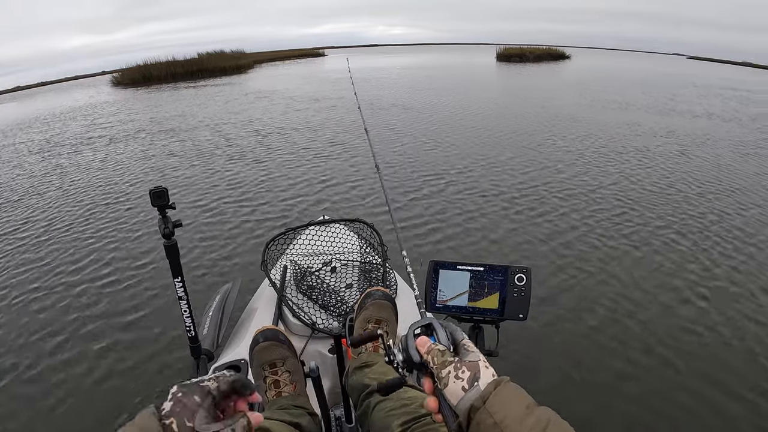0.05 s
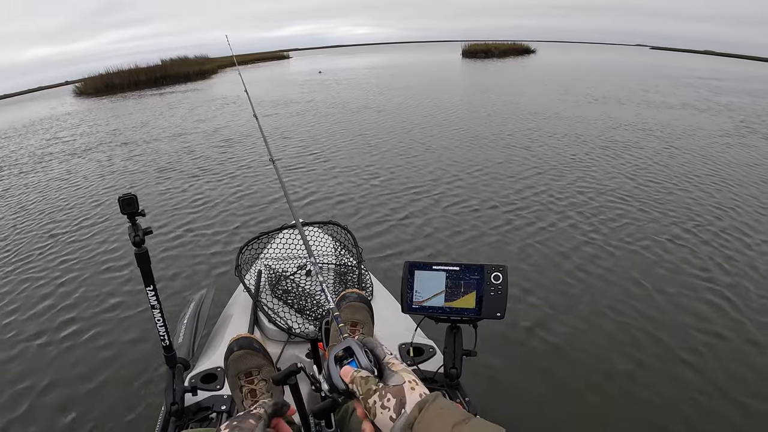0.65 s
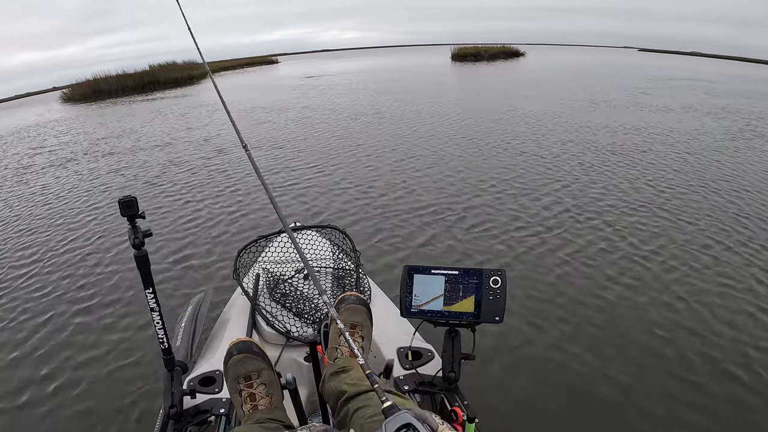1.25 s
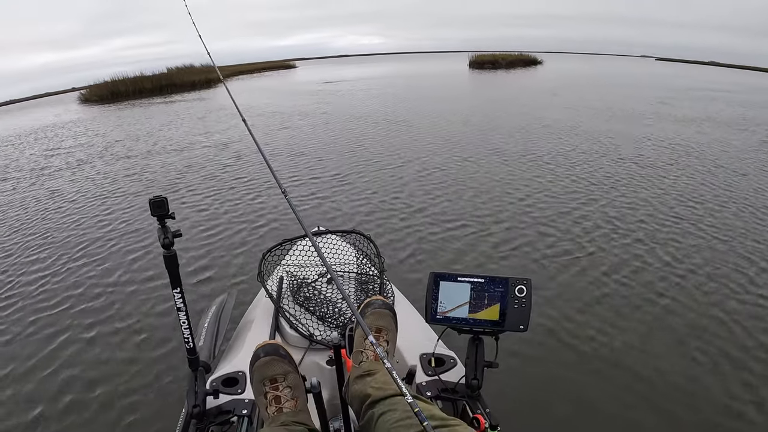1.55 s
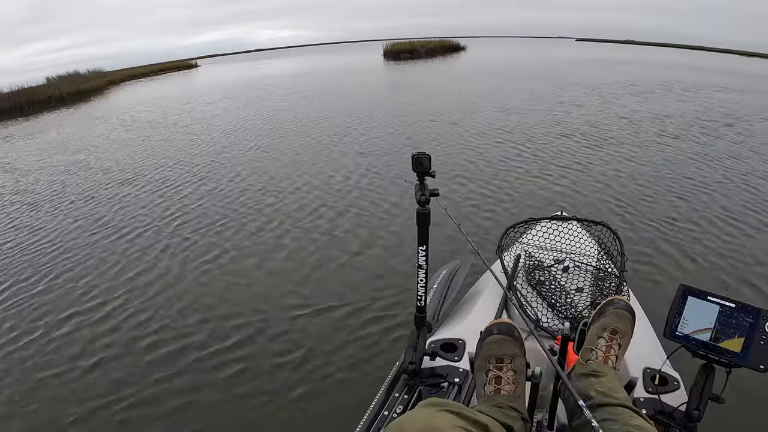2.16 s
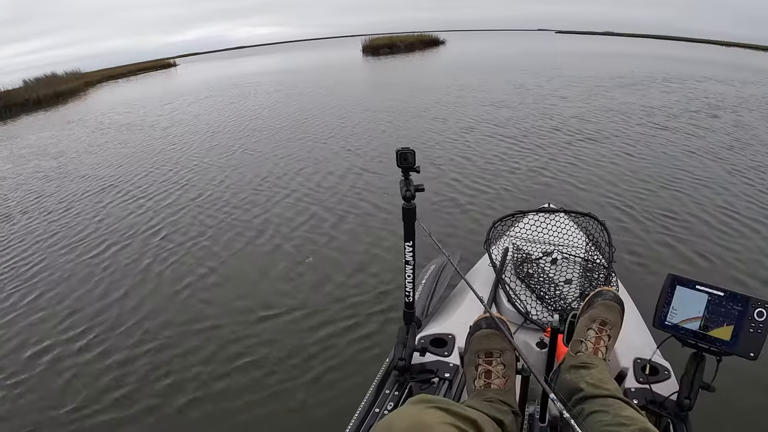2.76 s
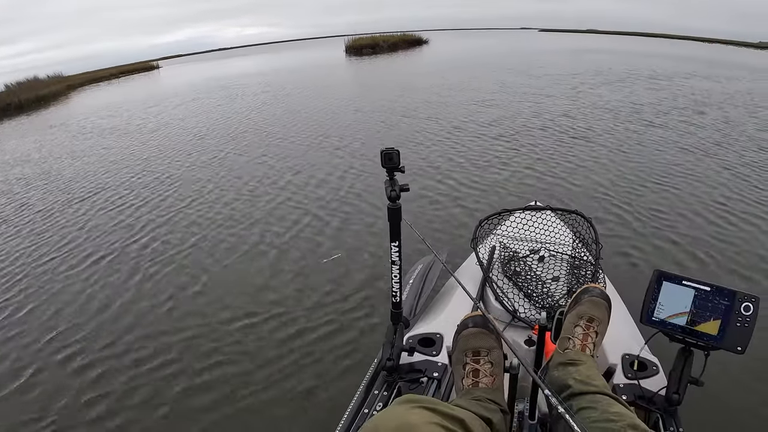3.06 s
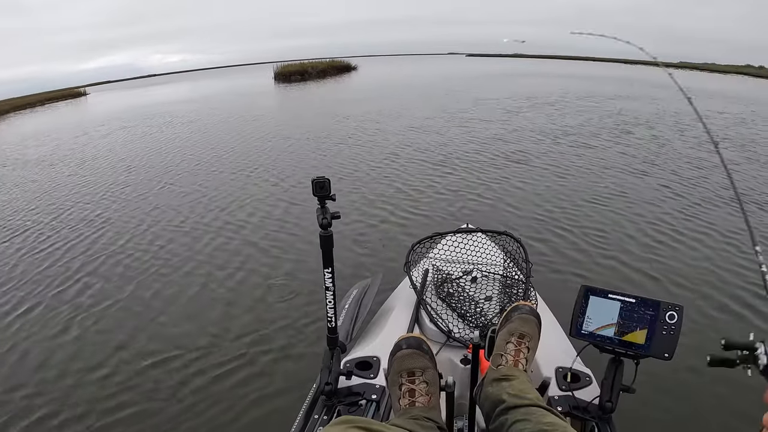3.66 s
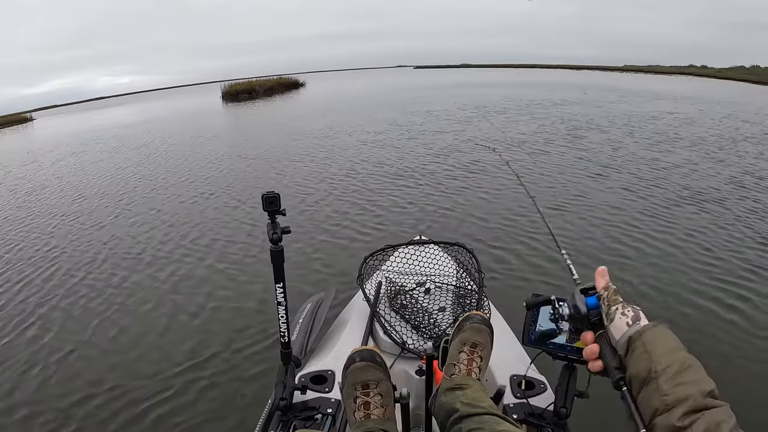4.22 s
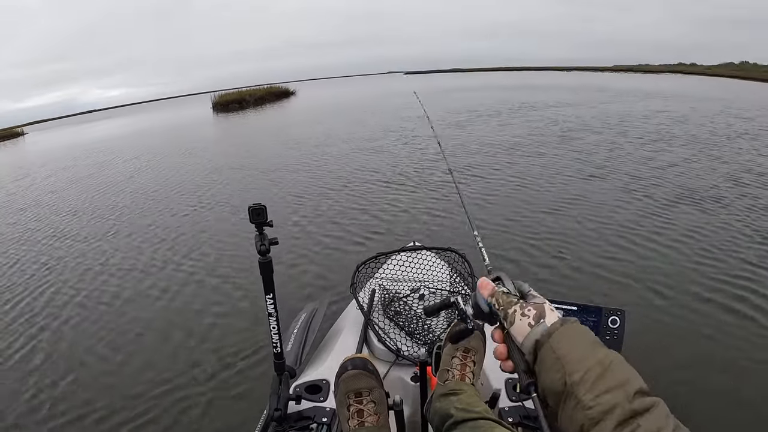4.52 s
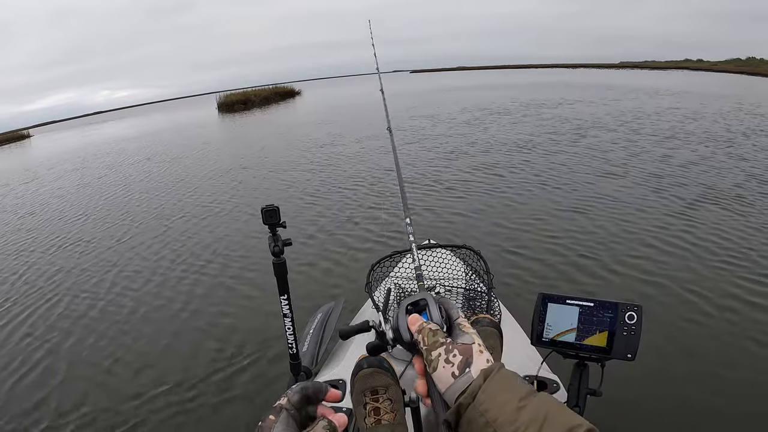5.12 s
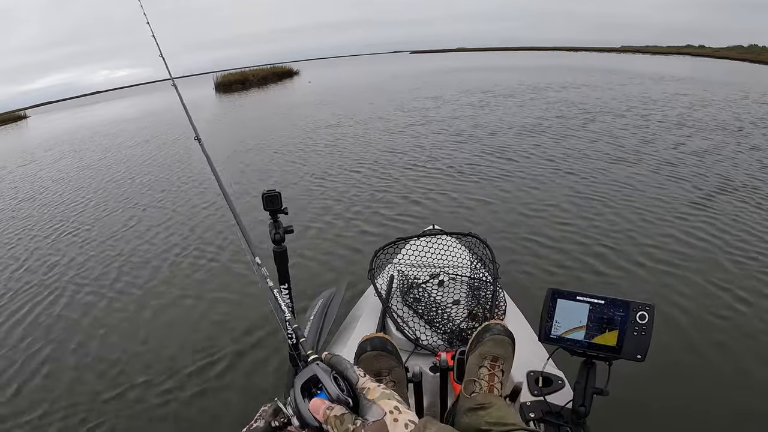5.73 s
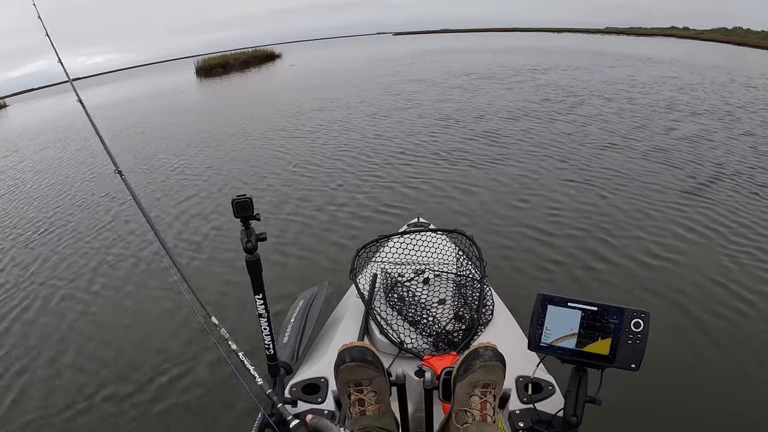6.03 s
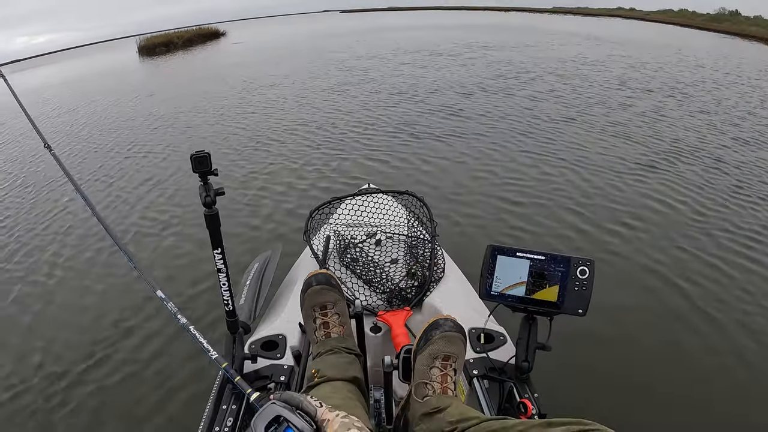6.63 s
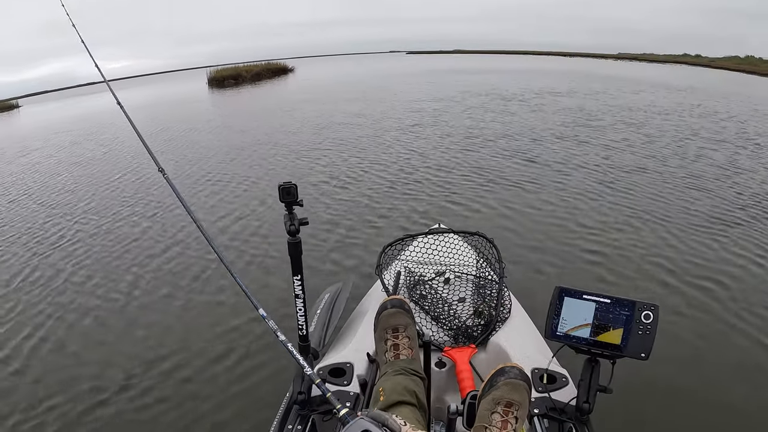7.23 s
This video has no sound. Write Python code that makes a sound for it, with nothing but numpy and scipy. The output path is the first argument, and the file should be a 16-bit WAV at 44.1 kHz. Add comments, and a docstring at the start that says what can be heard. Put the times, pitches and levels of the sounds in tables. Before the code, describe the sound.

A fishing rod swishes and its reel whirs and clicks, then feet bump a hollow plastic kayak, over light wind and a low hum.

```python
"""An angler casts from a plastic kayak, over a low hum, a light breeze on open water and rustling sleeves.
The spool of a baitcasting reel rings faintly and is stopped with a few clicks; two small drops plip.
The spool clicks free, the rod swishes and whistles, and the spool whines down as the line flies out.
Feet and gear bump the hollow hull, the reel snaps back into gear, and lighter bumps follow."""
import sys
import numpy as np
from scipy.fft import rfft, irfft, next_fast_len
from scipy.io import wavfile
from scipy.ndimage import uniform_filter1d, map_coordinates

SR = 44100
rng = np.random.default_rng(int(sys.argv[2]) if len(sys.argv) > 2 else 0)


def digitize_waveform(pressure):
    """Quantize a signal to 16-bit integers and store it at the path in sys.argv[1].

    Rows of a 2-D input are taken as channels; values are limited to [-1, 1].
    """
    field = np.atleast_2d(pressure).T
    bounded = np.clip(field, -1, 1)
    quanta = np.round(bounded * 32767).astype(np.int16)
    wavfile.write(sys.argv[1], SR, quanta)


N = 325678

# the bearings' partials: (multiple of the turning rate [x], level [dB])
BEARING_PARTIALS = [(34, -14.5), (35.3, -8), (44.5, -21), (62, -12.5)]
# fader ride on the bearings' whine: (time [s], relative level [dB])
BEARING_RIDE = [(4.3, -63), (4.5, -86), (4.58, -72), (4.69, -55), (4.8, -60.5), (4.94, -56), (5.0, -69),
                (5.35, -66), (5.85, -76)]
# tone colour of the bearings: (frequency [Hz], gain [dB])
BEARING_EQ = [(2500, 0), (5500, 1), (8700, 5), (9800, -11), (12000, -15), (16000, -30)]
# tone colour of line whipping off the spool: (frequency [Hz], gain [dB])
LINE_EQ = [(200, 5.5), (380, 0.5), (600, -4), (1200, -2), (2400, 3.5), (3300, 2), (4300, -8), (6000, -8)]
# resonances of the spool's metal: (frequency [Hz], width [Hz], level [dB])
SPOOL_MODES = [(5750, 630, -1.5), (7310, 270, 4.5), (8380, 240, -1.5), (9190, 500, -3), (10000, 520, -8),
               (12000, 1200, -22), (15190, 700, -14)]
# swells in which the turning spool rings: (start [s], length [s], relative level [dB])
SPOOL_SWELLS = [(.15, 0.39, -67), (4.18, .55, -62.5), (5.02, .3, -67), (5.36, 0.49, -61.5)]
# clutch and thumb bar cues: (time [s], level [dB], pitch [Hz], frame send [dB], spool ring send [dB],
# ring centre [Hz], contact length [s])
CLICK_CUES = [(0.592, -53.5, 3380, 1, -6.5, 7500, 0.00076), (1.0575, -43, 2600, -2, -8.5, 8500, 0.00052),
              (1.071, -38.5, 1980, -3.5, 11, 7450, 0.00076), (1.0728, -26.5, 3104, 3.5, 4.5, 7400, 0.00085),
              (3.611, -23, 3500, -6, -8.5, 5500, 0.00067), (4.551, -63, 5000, 8, -5, 11000, .001),
              (5.881, -43.5, 3000, 2.5, -2.5, 9500, 0.00055),
              (5.893, -28.5, 2600, -14.5, -13, 9500, 0.00043), (5.9062, -23.5, 2660, -4, 2, 9500, 0.00073)]
# tone colour of the reel's frame: (frequency [Hz], gain [dB])
FRAME_EQ = [(100, -18), (300, -17), (780, 0), (1150, -6), (1700, 0.5), (2100, 3), (2600, -8), (4000, -0.5),
            (4800, -19.5), (6000, -6), (9000, -27), (12000, -8.5), (16000, -19.5)]
# rod and sleeve sweeping the air: (time [s], level [dB], half length [s], brightness [Hz])
SWISH_CUES = [(1.177, -50, 0.019, 5470), (1.55, -68.5, 0.032, 12000), (2.125, -62.5, 0.017, 11000),
              (4.174, -36, 0.004, 2200), (4.197, -39, 0.013, 8400), (4.282, -42.5, 0.0133, 7300),
              (6.001, -50, 0.033, 3520), (6.077, -48, 0.018, 7000)]
# the rod tip's whistle through the cast: (time [s], pitch [Hz], level [dB])
TIP_GLIDE = [(4.09, 1200, -100), (4.125, 1367, -66), (4.15, 1447, -32.5), (4.17, 1585, -53),
             (4.205, 2430, -43), (4.24, 2380, -65), (4.26, 2200, -100)]
# bumps on the hull: (time [s], level [dB], brightness [Hz])
KNOCK_CUES = [(1.992, -48, 2400), (2.396, -46.5, 2030), (3.443, -48.5, 1800), (3.722, -49.5, 2700),
              (4.546, -47.5, 700), (4.975, -54, 1400), (5.368, -42, 1900), (5.662, -14, 1640),
              (5.726, -22, 1270), (5.786, -16, 870), (5.8881, -19, 1050), (6.028, -25, 1240),
              (6.568, -39.5, 700), (6.578, -36.5, 1900), (6.591, -30, 696), (6.676, -32, 730),
              (6.879, -32.5, 1470), (6.924, -37, 800), (6.977, -26.5, 810), (7.038, -33.5, 1900),
              (7.049, -33.5, 1100)]
# resonances of the hollow hull: (frequency [Hz], level [dB], 60 dB decay time [s])
HULL_MODES = [(155, -8, 0.24), (221, -3, 0.19), (342, 1.5, 0.089), (398.5, 1.5, 0.11), (510.5, -6.5, 0.17),
              (594.5, -6, 0.14), (773, -13.5, 0.1), (1436, -15, 0.09)]
# tone colour of the plastic shell: (frequency [Hz], gain [dB])
SHELL_EQ = [(40, -6), (110, -3.5), (160, 6), (260, -2.5), (370, 2), (500, -0.5), (780, -2), (1100, -5.5),
            (1500, -6.5), (2700, -7), (7000, -6), (16000, 12)]
# light ticks, and the hard, bright edge of some hull knocks: (time [s], level [dB], pitch [Hz])
TICK_CUES = [(2.279, -50.5, 4000), (2.318, -62.5, 2970), (2.365, -48.5, 4070), (3.483, -60.5, 2320),
             (3.530, -58, 2400), (3.671, -61.5, 3200), (3.814, -60, 2470), (5.369, -52, 2880),
             (6.581, -43.5, 2470), (7.039, -43, 2600)]
# drops and bubbles: (time [s], level [dB], starting pitch [Hz], swell time [s])
DROP_CUES = [(.899, -47, 975, 0.0092), (3.251, -56.5, 1820, 0.0054)]
# arms and legs moving inside their clothes: (start [s], length [s], level [dB])
CLOTH_SWELLS = [(-.05, 0.22, -53.5), (.22, 0.24, -63), (.65, 0.3, -57.5), (1.0, 0.16, -52.5),
                (1.25, 0.37, -54), (1.72, 0.15, -65), (2.0, 0.12, -55), (2.58, 0.24, -60.5),
                (2.86, 0.28, -65.5), (3.49, 0.043, -55.5), (3.64, 0.28, -66), (3.9, 0.12, -55),
                (4.09, 0.2, -48), (4.36, .35, -58), (4.8, 0.515, -59), (5.25, 0.94, -55.5),
                (5.84, 0.18, -48), (6.22, .55, -52.5), (6.8, 0.21, -60), (7.05, 0.3, -57)]
# tone colour of jacket cloth: (frequency [Hz], gain [dB])
CLOTH_EQ = [(80, -15), (170, 3.5), (350, -2), (700, -2), (1200, -3.5), (1500, -6), (2300, -5.5),
            (4000, -13.5), (6000, -20.5), (10000, -22.5), (16000, -27.5)]
# fader ride on the low hum: (time [s], relative level [dB])
HUM_RIDE = [(0.0, -41.0), (0.35, -40), (0.56, -56.5), (1.1, -38.5), (1.64, -43.5), (1.91, -53.5),
            (2.06, -44.5), (2.21, -59.5), (2.3, -49.5), (2.96, -39.5), (4.67, -39), (5.57, -52),
            (5.66, -47), (5.78, -49), (5.87, -41.5), (6.08, -57), (6.2, -43.5), (7.38, -33)]
# fader ride on the wind's buffeting: (time [s], relative level [dB])
WIND_RIDE = [(0.0, -46), (0.89, -46.5), (1.58, -46), (1.91, -43), (2.42, -49.5), (3.59, -48.5), (4.25, -49),
             (4.7, -44.5), (7.38, -43.5)]
# tone colour of the wind's rumble: (frequency [Hz], gain [dB])
WIND_EQ = [(8, -11), (22, 1), (35, -3), (60, -3.5), (100, -9.5), (140, -20.5), (200, -29), (400, -33.5),
           (1500, -97.5)]
# tone colour of the hush over open water: (frequency [Hz], gain [dB])
AIR_EQ = [(80, -6), (200, -4.5), (400, -2), (1000, 1), (2000, -4.5), (4000, -9), (8000, -12.5),
          (12000, -14.5), (16000, -18)]

TOP_HZ = 15850
# the cast spins the spool up at once; it coasts down towards the pace of the falling lure
CAST_S, SPIN_UP_S, STOP_S = 4.2, 0.013, 7.4
LAUNCH_TURNS_HZ, SETTLED_TURNS_HZ, COAST_S = 382.6, 62, 0.62
# a heavier bump stays in contact longer; a duller one rings the hull more
TYPICAL_KNOCK_DB, KNOCK_CONTACT_S, DB_PER_DOUBLED_CONTACT = -23.5, 0.0026, 47
TYPICAL_KNOCK_HZ, HOLLOW_DB, HOLLOW_DB_PER_OCTAVE = 1010, -4.5, -4


def spool(whirr_db=-60, steepness=3, ring_db=-1):
    """The spool slows as the lure flies: its whine dives while its metal rings at fixed pitches."""
    t = np.arange(N) / SR
    coast = np.exp(-np.maximum(t - CAST_S, 0) / COAST_S)
    turns_hz = SETTLED_TURNS_HZ + (LAUNCH_TURNS_HZ - SETTLED_TURNS_HZ) * coast
    flying = np.clip((t - CAST_S) / SPIN_UP_S + 1, 0, 1) * (t < STOP_S)
    whine = np.zeros(N)
    for multiple, db in BEARING_PARTIALS:
        hz = multiple * turns_hz
        whine += amp(db) * eq(BEARING_EQ, hz) * breathy_tone(hz, width_hz=65) * (hz < TOP_HZ)
    whine *= amp(curves(BEARING_RIDE)[0])
    # the whipping line speaks only at high speed, its upper harmonics more smeared
    whirr = sum(eq(LINE_EQ, k * turns_hz) * breathy_tone(k * turns_hz, 12 * k) for k in range(1, 18))
    whirr *= amp(whirr_db) * (turns_hz / LAUNCH_TURNS_HZ) ** steepness
    ringing = swells(SPOOL_SWELLS, attack_s=0.11, sag_db_per_s=2.5, release_s=0.06)
    ring = ringing * amp(ring_db + 2.2 * wobble(15)) * noise(spool_metal)
    return flying * (whine + whirr) + ring


def spool_metal(hz):
    """Gain of the spool's resonances together."""
    return np.sqrt(sum((amp(db) * peak(hz, centre, width) ** 1.17) ** 2
                       for centre, width, db in SPOOL_MODES))


def reel_clicks(part_db=-2, damping=0.32, ring_width_hz=2200, boat_db=-11, boat_hz=1900):
    """A small part snaps home at its own pitch; the frame, the boat and the spool answer."""
    out, t = np.zeros(N), np.arange(SR // 8) / SR
    for s, db, pitch_hz, frame_db, ring_db, ring_hz, contact_s in CLICK_CUES:
        snap = contact(t, contact_s, tail_db=-22, tail_t60=0.043)
        part = hit(filtered(snap, lambda hz: peak(hz, pitch_hz, damping * pitch_hz) ** 2.15))
        jolt = contact(t, contact_s, tail_db=-18, tail_t60=0.028)
        frame = hit(filtered(jolt, lambda hz: eq(FRAME_EQ, hz)))
        # each click rings the spool's metal, strongest near its ring centre
        ring = hit(filtered(snap, lambda hz: spool_metal(hz) ** 1.1 * peak(hz, ring_hz, ring_width_hz)))
        scatter = rng.standard_normal(len(t)) * amp(-60 * t / 0.079) * (1 - np.exp(-t / 0.0012))
        boat = hit(filtered(scatter, lambda hz: eq(FRAME_EQ, hz) * lowpass(hz, boat_hz)))
        body = frame + amp(boat_db) * boat
        add(out, s, amp(db) * (amp(part_db) * part + amp(frame_db) * body + amp(ring_db) * ring))
    return out


def swishes():
    """Rod and sleeve whoosh through the air, each swish with its own length and brightness."""
    out, t = np.zeros(N), np.arange(SR // 4) / SR
    for s, db, half_s, bright_hz in SWISH_CUES:
        hiss = rng.standard_normal(len(t))
        rush = unit(filtered(hiss, lambda hz: peak(hz, 1200, 9100) * lowpass(hz, bright_hz)))
        envelope = np.exp(-((t - t.mean()) / half_s) ** 2 / 2)
        add(out, s - t.mean(), amp(db) * rush * envelope)
    return out


def rod_whistle():
    """Eddies shed by the thin tip sing higher as it speeds up."""
    pitch_hz, db = curves(TIP_GLIDE)
    return amp(db) * breathy_tone(pitch_hz, width_hz=410)


def hull_knocks(scatter_db=-6, scatter_hz=700):
    """Each bump thuds on the plastic shell and sets the hollow hull ringing."""
    out, t = np.zeros(N), np.arange(SR // 4) / SR
    for s, db, bright_hz in KNOCK_CUES:
        contact_s = KNOCK_CONTACT_S * 2 ** ((db - TYPICAL_KNOCK_DB) / DB_PER_DOUBLED_CONTACT)
        body_db = HOLLOW_DB + HOLLOW_DB_PER_OCTAVE * np.log2(bright_hz / TYPICAL_KNOCK_HZ)
        shell = lambda hz: eq(SHELL_EQ, hz) * lowpass(hz, bright_hz, order=2.9)
        thud = filtered(contact(t, contact_s, tail_db=-11.5, tail_t60=0.12), shell)
        # inside the hull only the lows keep bouncing
        scatter = rng.standard_normal(len(t)) * amp(-60 * t / 0.29)
        hollow = filtered(scatter, lambda hz: shell(hz) * lowpass(hz, scatter_hz))
        ring = np.zeros(len(t))
        for mode_hz, mode_db, t60 in HULL_MODES:
            decay = amp(mode_db + rng.normal(0, 1.4) - 60 * t / t60)
            ring += decay * np.sin(2 * np.pi * (mode_hz * t + rng.random()))
        body = (hit(ring) + amp(scatter_db) * hit(hollow)) * (1 - np.exp(-t / contact_s))
        add(out, s, amp(db) * (hit(thud) + amp(body_db) * body))
    return out


def ticks(contact_s=0.0015, damping=0.25, part_db=-2, frame_db=-3, bright_hz=7500):
    """Light ticks and the hard, bright edge of some hull knocks: a pitched snap with the frame's colour."""
    out, t = np.zeros(N), np.arange(SR // 8) / SR
    for s, db, pitch_hz in TICK_CUES:
        touch = contact(t, contact_s, tail_db=-21, tail_t60=0.04)
        snap = filtered(touch, lambda hz: lowpass(hz, bright_hz, order=4))
        part = hit(filtered(snap, lambda hz: peak(hz, pitch_hz, damping * pitch_hz) ** 1.24))
        frame = hit(filtered(snap, lambda hz: eq(FRAME_EQ, hz)))
        add(out, s, amp(db) * (amp(part_db) * part + amp(frame_db) * frame))
    return out


def drops(rise_per_s=14, jitter=0.03):
    """A bubble plips, its pitch bending up unevenly as it nears the surface."""
    out, t = np.zeros(N), np.arange(SR // 8) / SR
    for s, db, start_hz, swell_s in DROP_CUES:
        envelope = t / swell_s * np.exp((1 - (t / swell_s) ** 2) / 2)
        pitch_hz = start_hz * (1 + rise_per_s * t + jitter * wobble(390)[:len(t)])
        add(out, s, amp(db) * envelope * np.sin(phase(pitch_hz)))
    return out


def sleeves(rest_db=-70):
    """Jacket cloth rubs in small uneven catches as each move gathers speed, eases off and rests."""
    catches_db = 1.4 * wobble(35) + 1.4 * wobble(400)
    motion = swells(CLOTH_SWELLS, attack_s=0.059, sag_db_per_s=5, release_s=0.12)
    return np.hypot(amp(rest_db), motion) * amp(catches_db) * noise(lambda hz: eq(CLOTH_EQ, hz))


def hum(hum_hz=90.6, waver_hz=3.184, fuzz_db=-10, trim_db=-1, flutter_db=0.5):
    """A low, fuzzy hum wavers in pitch and level."""
    tone = unit(np.sin(phase(hum_hz + waver_hz * wobble(22))))
    fuzz = noise(lambda hz: peak(hz, hum_hz, 28) ** 2)
    return amp(curves(HUM_RIDE)[0] + trim_db + flutter_db * wobble(13)) * (tone + amp(fuzz_db) * fuzz)


def breeze(trim_db=1.73, air_db=-66):
    """Light wind buffets the microphone over the even hush of open water."""
    gusts = amp(curves(WIND_RIDE)[0] + trim_db + 1.2 * wobble(6.2))
    return gusts * noise(lambda hz: eq(WIND_EQ, hz)) + amp(air_db) * noise(lambda hz: eq(AIR_EQ, hz))


def contact(t, length_s, tail_db, tail_t60):
    """A chattering transient and its scatter round the boat, driving all pitches about evenly."""
    strike = t / length_s * np.exp(1 - t / length_s)
    tail = amp(tail_db - 60 * t / tail_t60) * (1 - np.exp(-t / length_s))
    chatter = rng.standard_normal(len(t)) * (strike + tail)
    power = np.abs(uniform_filter1d(np.abs(rfft(chatter)) ** 2, size=36))
    flatten = (power / power.mean()) ** -0.5
    return filtered(chatter, lambda hz: np.interp(hz, np.fft.rfftfreq(len(t), 1 / SR), flatten))


def swells(rows, attack_s, sag_db_per_s, release_s):
    """Envelope of overlapping swells that rise, sag and die away."""
    power = np.zeros(N)
    for start, length, db in rows:
        t = np.maximum(np.arange(N) / SR - start, 0)
        release = np.exp(-np.maximum(t - length, 0) / release_s)
        power += (amp(db - sag_db_per_s * t) * np.minimum(t / attack_s, 1) * release) ** 2
    return np.sqrt(power)


def breathy_tone(pitch_hz, width_hz):
    """A narrow band of noise of rms 1 that follows a pitch curve."""
    angle = phase(pitch_hz)
    return unit(wobble(width_hz) * np.sin(angle) + wobble(width_hz) * np.cos(angle))


def noise(gain):
    """Steady noise of rms 1 with this gain over frequency."""
    m = next_fast_len(N)
    return unit(irfft(rfft(rng.standard_normal(m)) * gain(np.fft.rfftfreq(m, 1 / SR)), m)[:N])


def filtered(x, gain):
    """x through the minimum-phase filter with this gain over frequency."""
    m = 2 * next_fast_len(len(x) // 2 + 4096)
    cepstrum = irfft(np.log(np.maximum(gain(np.fft.rfftfreq(m, 1 / SR)), 1e-6)))
    cepstrum[1:m // 2] *= 2
    cepstrum[m // 2 + 1:] = 0
    return irfft(rfft(x, m) * np.exp(rfft(cepstrum)))[:len(x)]


def eq(points, hz):
    """Gain of an EQ curve drawn on a log frequency axis."""
    point_hz, db = np.transpose(points)
    return amp(np.interp(np.log(hz + 1), np.log(point_hz), db))


def peak(hz, centre, width):
    """Gain of one resonance."""
    return np.abs(hz * width / (centre ** 2 - hz ** 2 + 1j * hz * width))


def lowpass(hz, corner_hz, order=2):
    """Gain of a treble roll-off."""
    return 1 / (1 + (hz / corner_hz) ** order)


def curves(rows):
    """One automation lane for each column after the time."""
    s, *columns = np.transpose(rows)
    return [np.interp(np.arange(N) / SR, s, column) for column in columns]


def wobble(rate):
    """Smooth random modulation, rate knots a second."""
    return map_coordinates(rng.standard_normal(8192), [np.arange(N) * rate / SR], mode="mirror")


def phase(pitch_hz):
    """Running phase of a pitch curve."""
    return 2 * np.pi * np.cumsum(pitch_hz) / SR


def amp(db):
    """Gain of a level in dB."""
    return 10 ** (np.asarray(db) / 20)


def unit(x):
    """x at rms 1."""
    return x / np.sqrt(np.mean(x ** 2) + 1e-20)


def hit(x):
    """x with the energy of 10 ms at rms 1."""
    return x * np.sqrt(SR / 100 / np.sum(x ** 2))


def add(track, s, sound):
    """Mix a sound into the track at time s."""
    part = track[round(s * SR):][:len(sound)]
    part += sound[:len(part)]


def scene():
    """A close, dry mono mix: everything is within arm's reach, in open air."""
    hits = hull_knocks() + reel_clicks() + ticks() + drops()
    cast = swishes() + rod_whistle() + spool()
    bed = sleeves() + hum() + breeze()
    return (hits + cast + bed)[None]


def record(dry):
    """A brick-wall high cut on the whole mix."""
    m = next_fast_len(N + SR // 4)
    return irfft(rfft(dry, m) * (np.fft.rfftfreq(m, 1 / SR) < TOP_HZ), m)[:, :N]


dry = scene()
out = record(dry)
digitize_waveform(out)
```